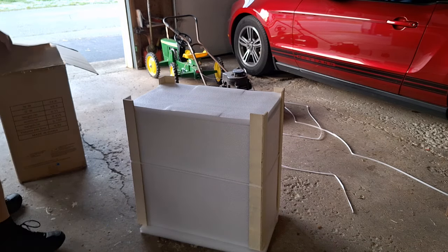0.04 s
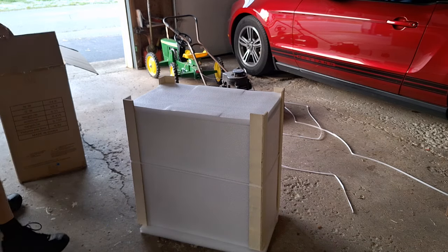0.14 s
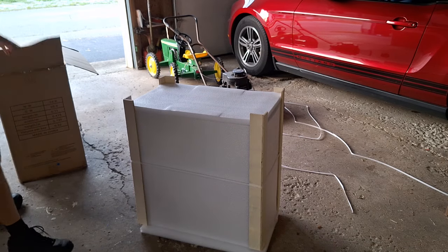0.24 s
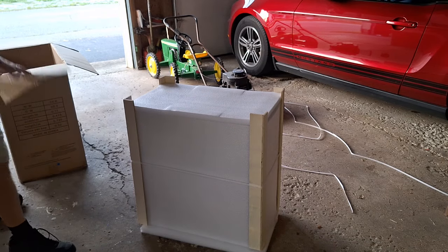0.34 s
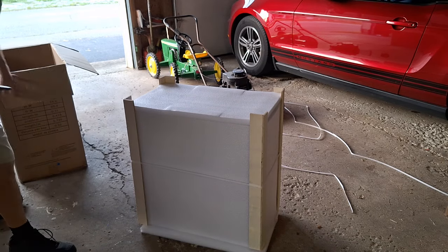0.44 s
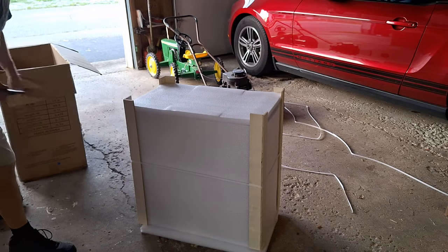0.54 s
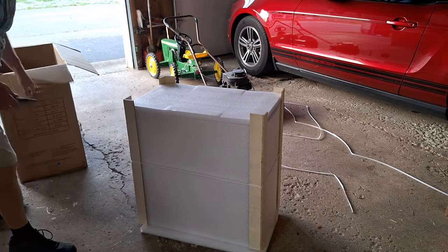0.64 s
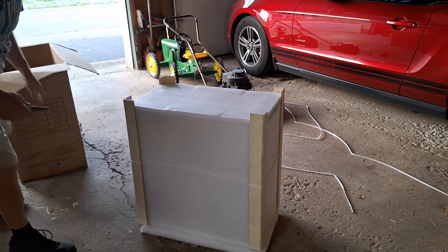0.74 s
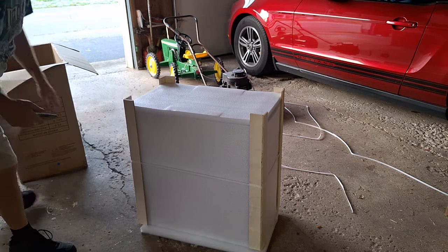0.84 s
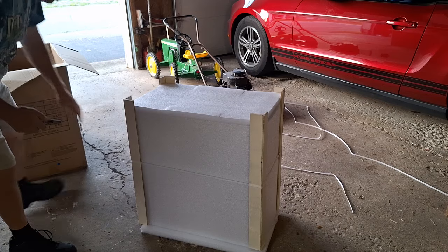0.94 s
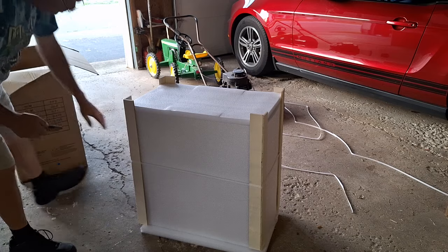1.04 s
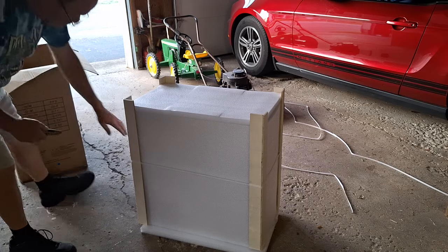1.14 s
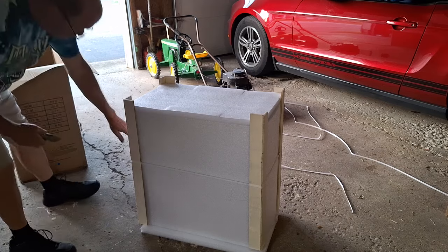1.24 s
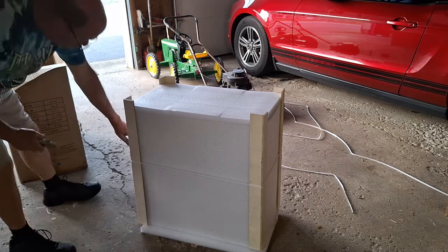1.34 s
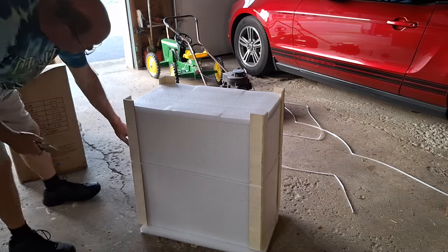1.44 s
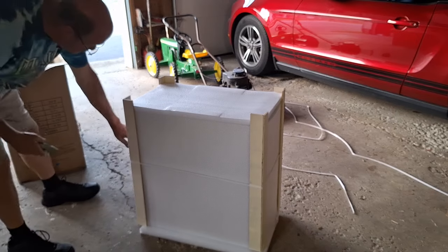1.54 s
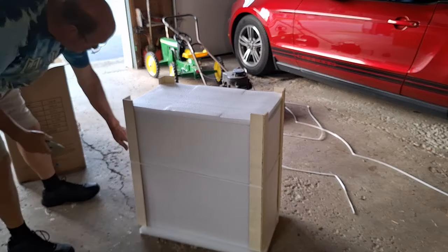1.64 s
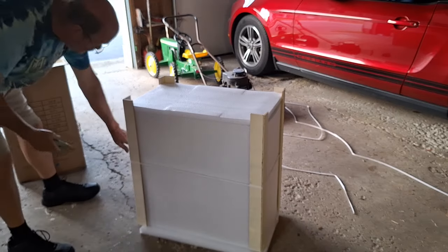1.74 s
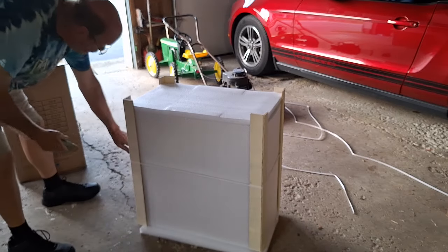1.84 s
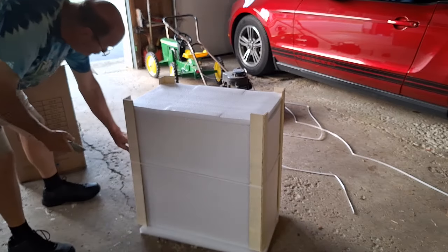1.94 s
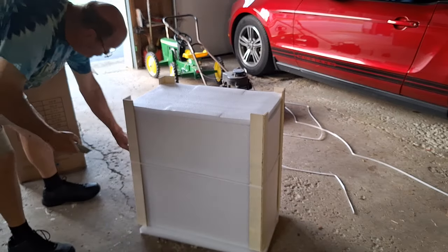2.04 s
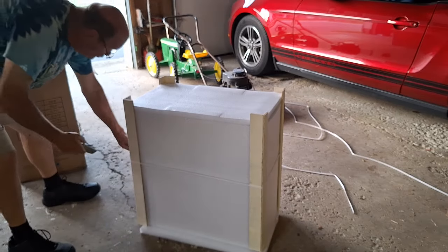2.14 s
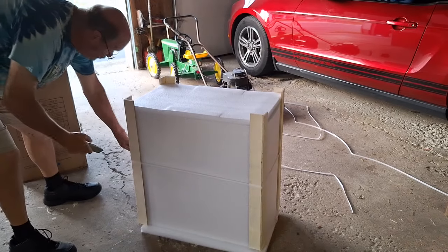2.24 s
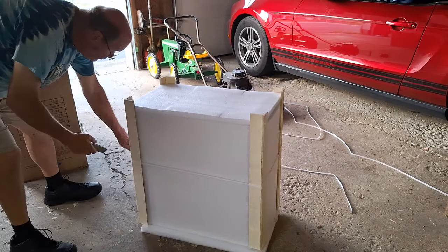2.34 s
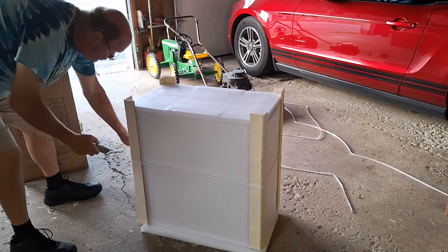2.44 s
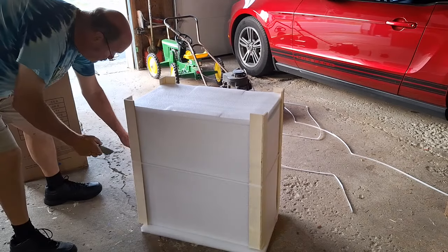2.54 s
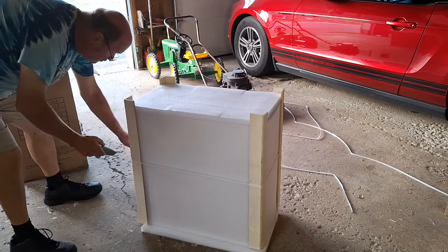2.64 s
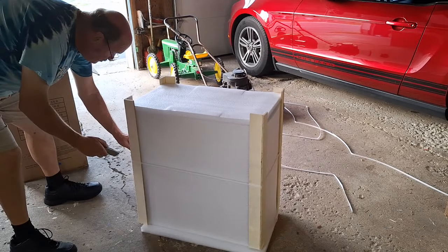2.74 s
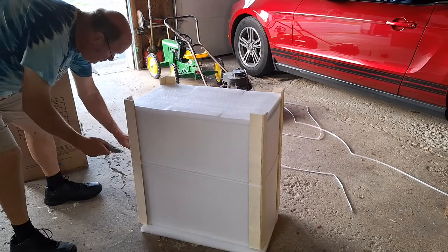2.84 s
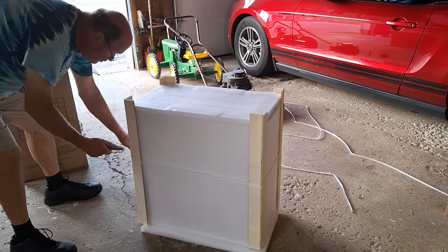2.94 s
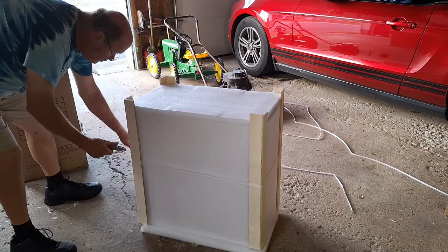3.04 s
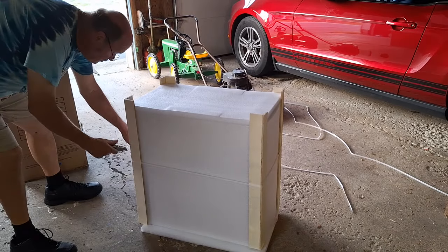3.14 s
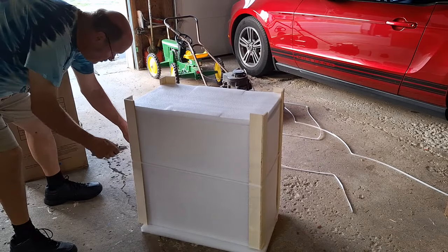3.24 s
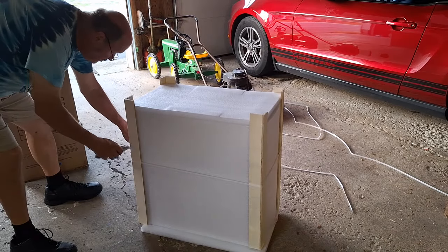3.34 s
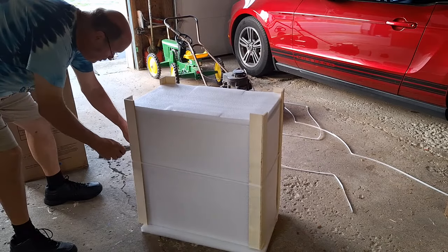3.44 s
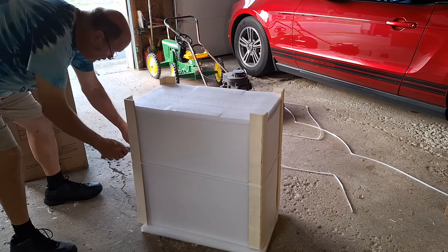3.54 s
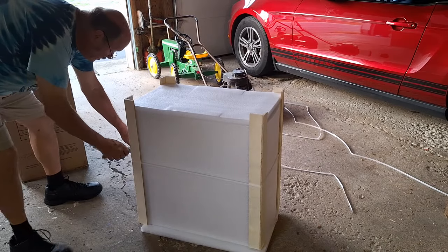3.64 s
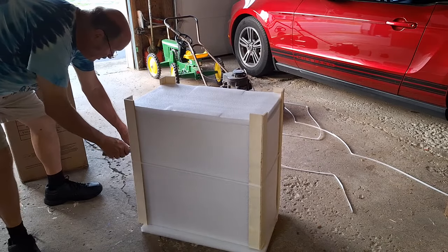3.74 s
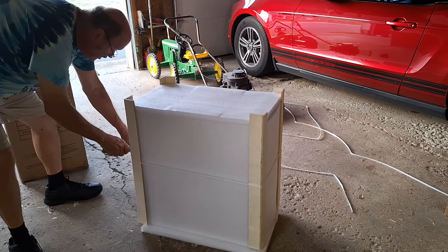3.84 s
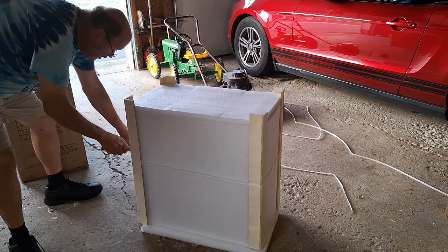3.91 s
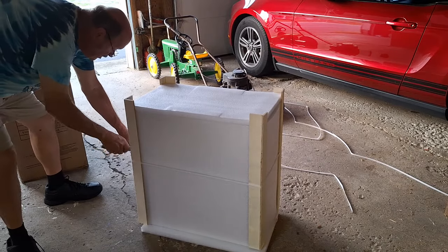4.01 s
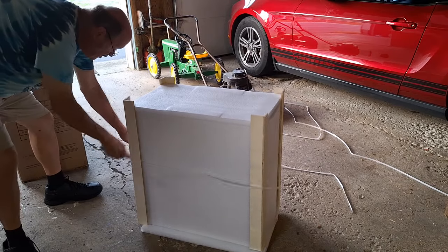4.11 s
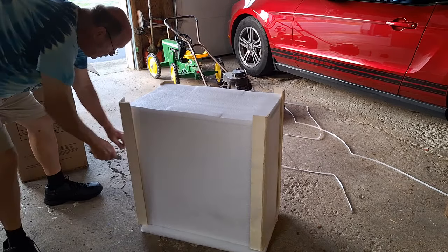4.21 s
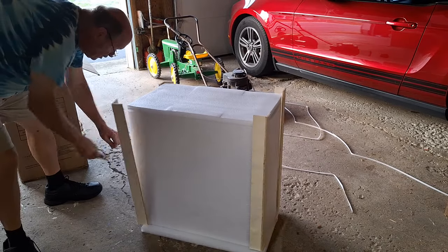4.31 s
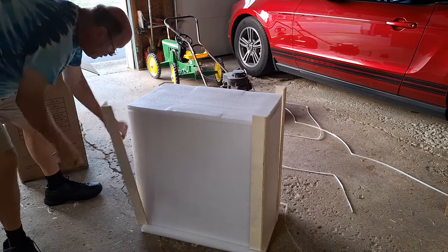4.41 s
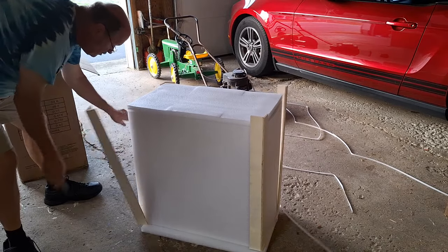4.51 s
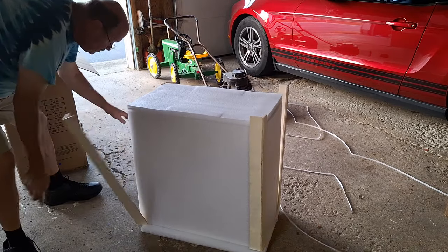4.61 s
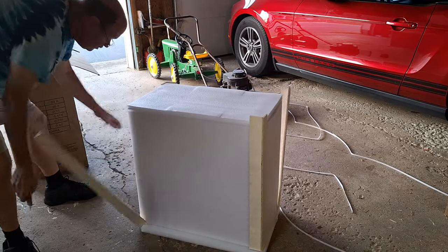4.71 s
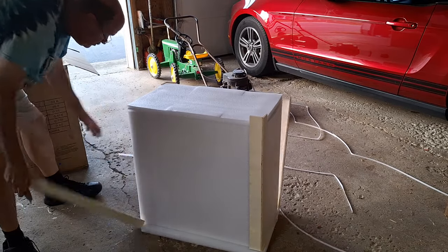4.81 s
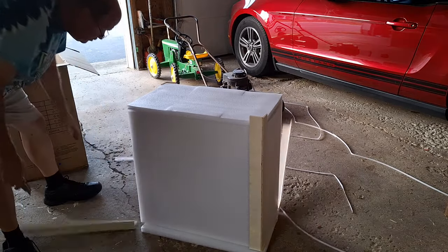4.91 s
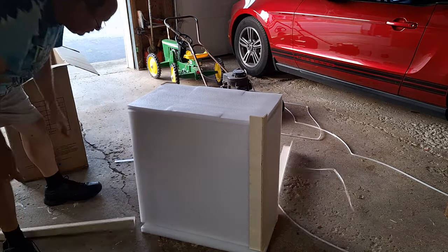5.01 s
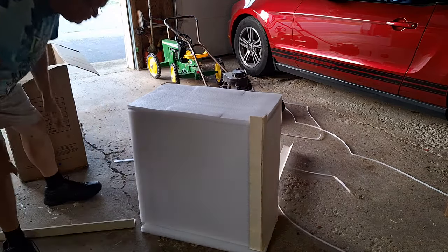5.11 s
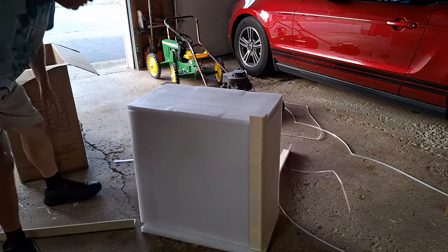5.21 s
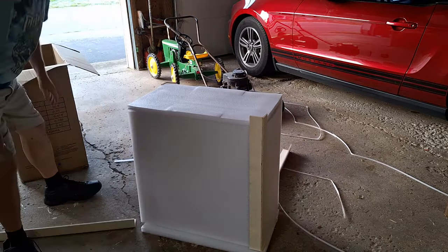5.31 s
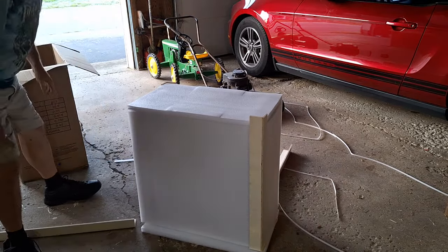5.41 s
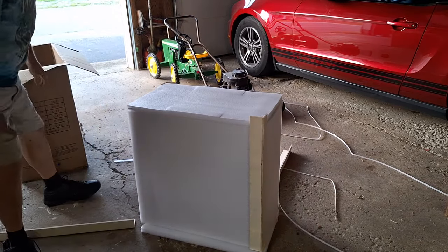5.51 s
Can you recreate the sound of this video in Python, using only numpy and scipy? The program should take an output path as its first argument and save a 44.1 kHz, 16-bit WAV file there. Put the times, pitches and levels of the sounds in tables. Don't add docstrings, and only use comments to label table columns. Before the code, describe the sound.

In an open concrete garage, cardboard rubs and knocks softly, shoes scuff, and faint bird whistles drift in. A blade squeaks briefly on a taut strap, which snaps with a hollow metallic boom. A loose post rattles, then slaps the floor very loudly, bouncing and ringing. Low traffic and insects continue outside. Small camera microphone, close by, stereo.

```python
import sys
import numpy as np
from scipy import signal
from scipy.fft import rfft, irfft, next_fast_len
from scipy.io import wavfile
from scipy.ndimage import map_coordinates

SR = 44100
rng = np.random.default_rng(int(sys.argv[2]) if len(sys.argv) > 2 else 0)


def generate_wav(signal):
    frames = np.transpose(np.atleast_2d(signal))
    scaled = np.clip(frames, -1, 1) * 32767
    pcm = np.round(scaled).astype(np.int16)
    wavfile.write(sys.argv[1], SR, pcm)


def boost_factor(decibels):
    exponent = np.asarray(decibels, float) / 20
    return 10 ** exponent


N = 245317

# (time [s], peak level [dB])
SLAPS = [(5.018, -7.5), (5.0391, -11), (5.0597, -7.5), (5.0799, -12), (5.0986, -22.5), (5.112, -20.5),
         (5.137, -22), (5.2351, -31.5), (5.2591, -29.5), (5.2748, -32), (5.3, -31.5)]
# (frequency [Hz], level [dB per Hz])
CRACK = [(1500, -21), (2300, -10), (3300, -2.5), (5800, -3), (7700, 2), (9400, -4), (12000, -0.5),
         (15700, -4.5)]
# (frequency [Hz], level [dB per Hz])
CARD = [(240, -52), (400, -11.5), (671, -2), (754, -3), (829, -5.5), (903, -3.5), (1040, -6.5),
        (1140, -3.5), (2010, -9.5), (5000, -16), (6500, -34), (11000, -120)]
# (frequency [Hz], level [dB per Hz])
THUD = [(41, -25), (70, -6), (97, -7), (204, 1), (278, -5.5), (316, 0.5), (900, -12), (1170, -60),
        (1980, -120)]
# (frequency [Hz], level [dB per Hz])
CLAP = [(2350, -15), (4000, -3), (7720, -5.5), (9930, -11.5), (13500, -10), (15700, -19)]
# (frequency [Hz], level [dB per Hz])
POST = [(240, -42), (400, -18.5), (594, -15.5), (764, -4), (925, -8), (1290, -4.5), (1410, -3.5),
        (2440, -5.5), (2920, -7), (7000, -30), (9100, -34), (15400, -120)]


def unit(x):
    return x / np.sqrt(np.mean(x ** 2) + 1e-20)


def along(points, hz):
    f, value = np.transpose(points)
    return np.interp(np.log(hz + 1), np.log(f + 1), value)


def curves(rows):
    s, *columns = np.transpose(rows)
    return [np.interp(np.arange(N) / SR, s, column, -120, -120) for column in columns]


def wobble(rate, size=N):
    knots = rng.standard_normal(int(max(size, SR // 2) * rate / SR) + 4)
    return map_coordinates(knots, [np.arange(size) * rate / SR])


def filtered(x, response):
    n = x.shape[-1]
    m = next_fast_len(n + 8192)
    return irfft(rfft(x, m) * response(np.fft.rfftfreq(m, 1 / SR)), m)[..., :n]


def coloured(spectrum, size):
    return unit(filtered(rng.standard_normal(size), lambda hz: boost_factor(along(spectrum, hz))))


def push(spectrum, like):
    pulse = filtered(signal.unit_impulse(len(like), 300), lambda hz: boost_factor(along(spectrum, hz)))
    return pulse * np.linalg.norm(like) / np.linalg.norm(pulse)


def ring(hz, db, t60):
    t = np.arange(min(SR // 2, round(1.2 * t60 * SR))) / SR
    flutter_db = min(hz, 1500) / 400 * wobble(70, len(t))
    drift = hz / 1100 * wobble(110, len(t))
    attack = 1 - np.exp(-t * hz / 0.58)
    tone = boost_factor(db + flutter_db - 60 * t / t60) * np.sin(2 * np.pi * hz * t + drift) * attack
    return np.pad(tone, (0, SR // 2 - len(t)))


def strokes(rows, rise, fall):
    t = np.arange(0, N / SR + .002, .001)
    power = 0
    for s, long, *db in rows:
        slope_db = rise * np.maximum(s - t, 0) + fall * np.maximum(t - s - long, 0)
        power = power + boost_factor(np.array(db)[:, None] - slope_db) ** 2
    return [np.interp(np.arange(N) / SR, t, np.sqrt(p)) for p in power]


def ports(pair, lag=8):
    # (frequency [Hz], correlation [-1 to 1])
    likeness = [(60, 0.93), (180, 0.93), (550, 0.687), (1650, -0.15), (4970, -0.076), (15000, -0.36)]
    turn = lambda hz: np.arccos(np.clip(along(likeness, hz), -1, 1)) / 2
    mid, side = filtered(pair, lambda hz: np.array([np.cos(turn(hz)), np.sin(turn(hz))]))
    return np.array([mid + side, np.roll(mid - side, round(lag))])


def echo(x):
    # (frequency [Hz], t60 [s])
    decay = [(120, 0.41), (500, 0.34), (2000, 0.49), (6000, 0.35), (14000, 0.28)]
    hz, t, z = signal.stft(rng.standard_normal((2, SR * 2 // 3)), SR, nperseg=256)
    tail = signal.istft(z * boost_factor(-60 * t / along(decay, hz)[:, None]), SR, nperseg=256)[1]
    build_up = 1 - np.exp(-np.arange(tail.shape[1]) / SR / 0.00085)
    tail = ports(tail * build_up)
    return signal.fftconvolve(x[None], tail / np.linalg.norm(tail[0]), axes=1)


def add(out, s, x, pan_db, wet_db, feed=None, lag=8):
    i = round(s * SR)
    out[0, i:i + len(x)] += boost_factor(pan_db / 2) * x
    out[1, i + lag:i + lag + len(x)] += boost_factor(-pan_db / 2) * x
    wet = echo(x if feed is None else feed)
    out[:, i:i + wet.shape[1]] += boost_factor(wet_db) * boost_factor([[pan_db / 4], [-pan_db / 4]]) * wet


def add_rings(out, rings):
    track = np.zeros(N)
    for s, *mode in rings:
        i = round(s * SR)
        track[i:i + SR // 2] += ring(*mode)[:N - i]
    add(out, 0, track, 1.5, -8)


def contacts(out, rows, top, body, t60, pan_db, wet_db, soft=0.037):
    t = np.arange(SR // 4) / SR
    attack = 1 - np.exp(-t / (soft * t60))
    for s, db, body_db, thud_db in rows:
        crack = coloured(top, len(t)) * boost_factor(db - 5.0 - 60 * t / t60)
        hollow = coloured(body, len(t)) * boost_factor(db - 4.0 + body_db - 60 * t / (1.62 * t60))
        thud = coloured(THUD, len(t)) * boost_factor(db - 2.0 + thud_db - 60 * t / (3 * t60))
        thud = thud * (1 - np.exp(-t / 0.0019))
        feed = push(top, crack) + push(body, hollow) + thud
        add(out, s, (crack + hollow + thud) * attack, pan_db, wet_db, feed)


def post_slap(out):
    # (time [s], crack level [dB],
    # body over crack [dB], thud over crack [dB])
    edges = [(5.0400, -10.5, 1, -29.5), (5.0600, -7.5, -5, -26), (5.0660, -8, -7, -30),
             (5.0985, -13, -1, -28), (5.139, -21, 1, -30), (2.2128, -43, -9, -30), (4.2726, -23, -1, 1),
             (5.0187, -8.5, -14, -4)]
    # (time [s], crack level [dB], body over crack [dB], thud over crack [dB])
    settle = [
        (5.386, -50, 21.8, 2.7),
        (5.402, -55, 20.3, 2.8),
        (5.4193, -59.5, 17, 3),
    ]
    # (frequency [Hz], level [dB], t60 [s])
    flat = [(268, -20, 0.11), (1283, -3, 0.078), (1510, -2.5, .05), (2075, -6, 0.082), (2410, 1, 0.045),
            (3180, -6, .05), (3730, -1, 0.043)]
    contacts(out, edges, CLAP, POST, t60=0.0037, pan_db=5.0, wet_db=-1)
    slaps = [(s, db, 2.5, -24 - 0.3 * db) for s, db in SLAPS]
    contacts(out, slaps, CLAP, POST, t60=0.026, pan_db=1.5, wet_db=0.5)
    contacts(out, settle, CLAP, POST, t60=0.035, pan_db=1.5, wet_db=0.5, soft=0.096)
    below_slap_db = -10
    add_rings(out, [(s, hz, db + level + below_slap_db + rng.normal(0, 2.77), t60)
                    for s, db in SLAPS for hz, level, t60 in flat])


def strap_snap(out):
    # (time [s], crack level [dB], body over crack [dB], thud over crack [dB])
    snap = [
        (4.158, -11, -6, -14),
    ]
    # (frequency [Hz], level [dB per Hz])
    snap_top = [(600, -6), (1300, -11), (2200, -24), (3400, -25), (5500, -13), (8000, -3), (12000, -4.5),
                (15700, -4.5)]
    # (frequency [Hz], level [dB], t60 [s])
    panels = [(146.4, -3.5, 0.081), (135, -17.5, 0.33), (163.1, -18, 0.33), (194.5, -21, 0.37),
              (224, -22.5, 0.21), (332, -25, 0.15), (420, -30, 0.09), (437, -13.5, 0.036),
              (1293, -17, 0.029), (617, -22, .04), (1640, -25.5, 0.026), (950, -38, 0.13),
              (1310, -27.5, 0.23), (2070, -41, 0.107), (2430, -39, .1)]
    contacts(out, snap, snap_top, CARD, t60=0.031, pan_db=3.0, wet_db=-0.6)
    add(out, 4.1585, sum(ring(*mode) for mode in panels), 1.5, -8)


def loose_post(out):
    # (time [s], level [dB])
    rattle = [(4.272, -26), (4.293, -29.5), (4.316, -30), (4.333, -33), (4.361, -30), (4.369, -31.5),
              (4.385, -35), (4.417, -31.5), (4.44, -37.5), (4.455, -40)]
    # (frequency [Hz], level [dB], t60 [s])
    loose = [(750, -.6, .11), (910, -1.2, .13), (1140, -3, .08), (1310, -6, .08), (1570, -5, .1),
             (1850, -10, .06), (2200, -9, .07), (2450, -10, .05)]
    add_rings(out, [(s, hz, db + level + rng.normal(1, 2.8), t60)
                    for s, db in rattle for hz, level, t60 in loose])


def strap(out):
    # (time [s], pitch [Hz], level [dB])
    squeak_path = [(3.645, 1090, -66), (3.66, 1070, -50), (3.68, 1040, -44), (3.72, 995, -46),
                   (3.74, 985, -60)]
    # (time [s], level [dB])
    saw = [(3.665, -64), (3.69, -44), (3.75, -42), (3.78, -46), (3.815, -48), (3.84, -56), (3.95, -74)]
    # (frequency [Hz], width [Hz], level [dB])
    resonances = [(635, 170, -3), (1030, 200, -5), (1730, 300, -6), (2400, 600, -10), (3220, 500, -10)]
    # (time [s], frequency [Hz], level [dB], t60 [s])
    twangs = [(3.692, 640, -38, 0.073), (3.716, 630, -34.5, 0.078), (3.74, 645, -30.5, 0.076),
              (3.753, 660, -37, .05), (3.797, 643, -41, .08), (3.855, 600, -46, 0.11),
              (3.878, 607, -42, 0.057)]

    def taut(f):
        total = 0
        for k, (centre, width, db) in enumerate(resonances):
            peak = 1j * f * width / (centre * centre - f * f + 1j * f * width)
            total = total + (-1) ** k * boost_factor(db) * peak
        return total

    hz, db = curves(squeak_path)
    turn = 2 * np.pi * np.cumsum(hz * (1 + 0.02 * wobble(150))) / SR
    voice = np.sin(turn) + 1.0 * np.sin(2 * turn) + 0.078 * np.sin(3 * turn)
    squeak = boost_factor(db + 2.0 + 1.5 * wobble(90)) * voice
    slips = rng.standard_normal(N) * boost_factor(3 * wobble(110))
    sawing = boost_factor(curves(saw)[0] + 1.0) * unit(filtered(slips, taut))
    add(out, 0, squeak + sawing, 2.5, -4)
    add_rings(out, twangs)


def handling(out):
    # (time [s], crack level [dB], body over crack [dB], thud over crack [dB])
    box = [(0.184, -33.5, -12, -5.5), (0.4403, -45, 4.5, -32), (.489, -38.5, -7, 2), (0.5064, -33, 1, 1),
           (.528, -41, -5, 8), (.562, -47, -9, 6), (.659, -48.5, -2, 3), (0.7593, -40.5, -24, -2.5),
           (.854, -48.5, -10, 9.5)]
    shoes = [(1.018, -49, -24, -3), (1.2184, -52.5, -8, -1), (1.3726, -48, -0.5, -0.5),
             (1.5189, -52.5, 2, 5.5), (1.837, -49, -2.5, -1), (2.07, -48, -5.5, -1), (2.1639, -51, 2.5, 3),
             (2.2117, -38.5, -3, -10.5), (2.25, -37.5, -1, -7), (2.5696, -47.5, -15.5, -24.5)]
    hands = [(4.019, -56, -16, -1), (4.2709, -31, 9, 1.5), (4.419, -50.5, 12, 12.5),
             (4.5011, -22, -15, -30), (4.8895, -34, -14, -31)]
    scuffs = [(.108, -35, -8.5, -18), (.8, -33, -25.5, -10.5), (2.423, -37.5, -1, -18.5),
              (4.128, -29, -13, -13.5), (4.359, -46, 17, 8.5), (4.725, -35, -6.5, -38)]
    ticks = [(4.272, -27.5, 8.5, 3), (4.641, -31.5, -7, -35), (4.9052, -32, -12, -24),
             (4.1605, -11.5, -12, -30), (4.8897, -30, -13, -30), (4.2802, -37, 15, 0), (4.303, -40, 17, 0),
             (4.3165, -40, 18, 0), (4.3612, -40.5, 18, 0), (4.3688, -40, 18, 0), (4.4175, -47, 18, -1),
             (.5073, -33.5, 7, 5.5), (2.4, -52, 8, -5), (2.2128, -42, 6, -10), (.195, -46, 8, 5)]
    latch = [
        (.44, -29, -6, -21),
        (4.335, -33, -30, -30),
    ]
    snip = [
        (2.8224, -31.5, -46, -30),
    ]
    buckle = [
        (5.383, -23.5, -5, -25),
    ]
    # (frequency [Hz], level [dB per Hz])
    snip_top = [(1800, -40), (2400, -5), (3300, -3.5), (5800, -4.5), (7700, 1.5), (9400, -8), (12000, 1.5),
                (15700, -8)]
    buckle_top = [(1200, -14), (3000, -4), (5500, 0), (8000, -2), (9000, -25), (16000, -40)]
    contacts(out, box, CRACK, CARD, t60=0.036, pan_db=1.5, wet_db=1.0)
    contacts(out, shoes, CRACK, CARD, t60=0.048, pan_db=5.0, wet_db=2.1)
    contacts(out, hands, CRACK, CARD, t60=0.0561, pan_db=3.0, wet_db=0.95)
    contacts(out, scuffs, CRACK, CARD, t60=0.044, pan_db=2.0, wet_db=3.5, soft=0.072)
    contacts(out, ticks, CRACK, CARD, t60=0.0046, pan_db=-1.5, wet_db=3.0)
    contacts(out, latch, CRACK, CARD, t60=0.005, pan_db=4, wet_db=-4)
    contacts(out, snip, snip_top, CARD, t60=0.031, pan_db=3.2, wet_db=4.0)
    contacts(out, buckle, buckle_top, CARD, t60=0.005, pan_db=-1, wet_db=-11)


def card_rings(out):
    # (time [s], frequency [Hz], level [dB], t60 [s])
    singles = [(.508, 172.6, -28.5, 0.21), (.508, 211, -26, 0.13), (0.2, 150, -48, 0.18),
               (2.25, 140, -41, 0.36), (2.438, 403, -40.5, 0.15), (5.385, 159, -41, .16),
               (.187, 900, -38.5, 0.12), (.21, 1000, -40, 0.109), (.19, 1500, -45, 0.065),
               (.51, 740, -36, 0.18), (0.47, 610, -50, 0.1), (.75, 560, -42, 0.17), (.678, 762, -42, 0.073),
               (.808, 820, -44.5, 0.062), (0.81, 560, -43, 0.14), (4.8895, 5180, -37.5, .02),
               (5.3, 4200, -47, .02), (.195, 1250, -37.5, 0.078), (0.17, 1130, -39, .12),
               (.2, 780, -43, 0.091), (.225, 950, -40, .07), (.25, 1050, -43, 0.093), (.278, 820, -49, .08),
               (5.019, 330, -27.5, 0.16), (5.019, 220, -31, 0.13), (5.02, 430, -28.5, 0.11),
               (2.212, 640, -40, 0.047), (2.25, 980, -37.5, .12), (2.252, 388, -40, .06),
               (2.432, 850, -41, 0.11), (5.055, 1280, -13.5, 0.11), (5.07, 1090, -17.5, .1),
               (5.062, 2200, -20, .1), (.512, 9500, -45, .05), (0.77, 640, -42, 0.096),
               (2.5, 644, -41.5, 0.053), (4.131, 606, -36.5, 0.21), (5.235, 1380, -20, 0.029),
               (5.257, 1816, -26, 0.12), (5.272, 1600, -29, 0.091), (5.386, 2100, -36, 0.076)]
    add_rings(out, singles)


def slide(out):
    # (start [s], length [s], fizz level [dB], body level [dB])
    rubs = [(.015, 0.4, -54.5, -57.5), (.11, 0.056, -43.5, -45), (.185, 0.047, -62, -38),
            (.25, 0.046, -54, -47), (.445, 0.32, -53, -61), (.5, 0.036, -43.5, -43), (.74, 0.116, -52, -45),
            (1.03, 0.029, -64, -58), (1.19, 0.17, -67.5, -56), (1.34, 0.084, -63, -51),
            (1.53, 0.043, -67, -50), (1.84, 0.04, -66, -50.5), (2.07, 0.16, -70, -55),
            (2.21, 0.079, -70, -42), (2.435, 0.018, -45.5, -42), (3.68, 0.087, -50, -41),
            (3.765, 0.036, -50, -37.5), (3.95, 0.31, -78, -54.5), (4.5, 0.59, -56, -53.5),
            (4.51, 0.02, -58, -41.5), (4.72, 0.059, -56, -51), (4.95, 0.049, -54, -51),
            (5.258, 0.14, -53, -54), (.63, 0.11, -58, -45.5), (.84, 0.038, -62, -39), (.06, .06, -56, -52),
            (.04, .05, -57, -55), (.09, .03, -53, -56)]
    # (frequency [Hz], level [dB per Hz])
    fizz_tone = [(1500, -23), (2300, -5), (3300, -1.5), (5000, -6), (7700, 0.5), (9400, -3.5),
                 (12000, -2.5), (15700, -1)]
    # (frequency [Hz], level [dB per Hz])
    scrape_tone = [(200, -34), (400, -6), (700, 2), (1000, 0), (1350, -2.5), (2000, -10.5), (5000, -14),
                   (9000, -60)]
    bright, dull = strokes(rubs, rise=898.5, fall=219)
    fizz = unit(coloured(fizz_tone, N) * boost_factor(1.6 * wobble(230) + 2.3 * wobble(33.95)))
    body = unit(coloured(scrape_tone, N) * boost_factor(2.5 * wobble(120) + 1.5 * wobble(30)))
    low = unit(coloured(THUD, N) * boost_factor(3.3 * wobble(25)))
    add(out, 0, boost_factor(-2.5) * bright * fizz + dull * (boost_factor(-12) * body + boost_factor(-16) * low), 1.5, -3)


def bird(out):
    # (time [s], length [s], start pitch [Hz], level [dB], slide time [s])
    whistles = [ (1.7, .045, 2950, -73, .015), (1.75, .028, 2600, -69, .006), (1.862, .03, 2950, -63, .035),
                (1.885, .045, 2850, -64, .018), (2.345, .055, 2290, -62, .026),
                (2.405, .04, 2650, -61, .05), (2.31, .03, 2400, -61, .02), (2.836, .09, 3100, -63, .011),
                (2.918, .11, 2430, -62, .026), (3.02, .075, 2720, -61, .034), (3.025, .03, 3250, -66, .03),
                (3.115, .03, 2550, -67, .012), (2.825, .03, 3500, -64, .03), ]
    # (time [s], length [s], top pitch [Hz], level [dB])
    flicks = [
        (1.772, .095, 2480, -62),
        (2.8, .03, 3250, -70),
        (2.885, .03, 2950, -66),
        (1.91, .045, 2780, -72),
    ]
    rest_hz, arch_hz = 2270, 200
    song = np.zeros(N)
    waver, throb_db = 1 + .017 * wobble(150), 4 * wobble(70)
    for s, long, top, db, *slide_s in whistles + flicks:
        t = np.arange(round(long * SR)) / SR
        i = round(s * SR)
        here = slice(i, i + len(t))
        arch = np.sin(np.pi * t / long)
        if slide_s:
            hz = rest_hz + (top - rest_hz) * np.exp(-t / slide_s[0])
        else:
            hz = top - arch_hz * (1 - arch)
        turn = 2 * np.pi * np.cumsum(hz * waver[here]) / SR
        song[here] += boost_factor(db + throb_db[here]) * arch ** .4 * np.sin(turn)
    add(out, 0, song, 3, -6, lag=0)


def outside():
    # (time [s], level [dB])
    traffic = [(0.0, -56), (0.67, -52.5), (1.72, -56.5), (2.29, -54), (4.29, -55.5), (4.54, -54),
               (4.79, -53.5), (5.22, -64), (5.56, -58)]
    # (start [s], length [s], level [dB])
    engine = [
        (0, 0.24, -64),
        (1.45, 0.069, -56.5),
        (2.2, 0.3, -57.5),
        (4.1, 0.85, -53.5),
    ]
    # (time [s], level [dB])
    chorus = [(0, -64), (5.1, -62), (5.45, -69), (5.563, -64)]
    # (frequency [Hz], level [dB per Hz])
    air_tone = [(15, -37), (25, -7), (58, 1), (124, -18.5), (209, -22.5), (325, -26.5), (366, -22),
                (466, -36.5), (558, -23.5), (616, -31.5), (958, -37.5), (1220, -37), (1750, -45.5),
                (2410, -43), (3000, -57), (3900, -83), (6600, -120)]
    # (frequency [Hz], level [dB per Hz])
    insect_tone = [(2200, -54), (2900, -20), (3500, -8), (4500, -6), (5400, -3.5), (6300, -12), (7600, -15),
                   (9100, -26.5), (16000, -27.5)]
    # (frequency [Hz], left over right [dB])
    lean_curve = [(60, 4), (240, 0.5), (950, 3), (3770, 4), (15000, 2.5)]
    (rumble_db,), (insects_db,) = curves(traffic), curves(chorus)
    rumble_tone = [(20, -44), (38, -4.0), (52, 2), (62, 0), (75, -6.5), (110, -74.0)]
    rumble = boost_factor(rumble_db + 8.0 + 0.52 * wobble(5.26)) * coloured(rumble_tone, (2, N))
    swell = boost_factor(-63) + strokes(engine, rise=61, fall=61)[0]
    drone_tone = [(60, -30), (88, -3.5), (99, 5.5), (112, -3.0), (170, -46.0)]
    drone = boost_factor(1.0) * swell * coloured(drone_tone, (2, N))
    above_rumble = [(90, -70)] + [p for p in air_tone if p[0] > 120]
    air = boost_factor(-59.5 + 0.56 * wobble(2.84)) * coloured(above_rumble, (2, N))
    insects = boost_factor(insects_db + 2.5 + 0.52 * wobble(32.0)) * coloured(insect_tone, (2, N))
    whine_hz = 12900
    whine = boost_factor(insects_db - 27.0 + 4.3 * wobble(60)) * np.sin(2 * np.pi * whine_hz * np.arange(N) / SR)
    lean = lambda hz: boost_factor(along(lean_curve, hz) * [[.5], [-.5]])
    return filtered(ports(rumble + drone + air + insects), lean) + whine


def scene():
    # (frequency [Hz], left over right [dB])
    near_balance = [(100, -1), (4000, 0.5), (9000, 1.5), (15000, -8.5)]
    out = np.zeros((2, N + SR))
    post_slap(out)
    strap_snap(out)
    loose_post(out)
    strap(out)
    handling(out)
    card_rings(out)
    slide(out)
    bird(out)
    near = filtered(out[:, :N], lambda hz: boost_factor(along(near_balance, hz) * [[.5], [-.5]]))
    return near + outside()


def top_cut(x):
    return signal.sosfilt(signal.butter(12, 16810, fs=SR, output="sos"), x)


def record(dry):
    top_hz, edge_hz, bass_hz = 15800, 16600, 37

    def response(hz):
        band = np.where(hz < top_hz, 1, boost_factor(-42) * (hz < edge_hz))
        return band / (1 - 1j * bass_hz / (hz + 1)) ** 2

    kept = filtered(np.clip(dry, -.95, .95), response)
    return top_cut(kept)


dry = scene()
out = record(dry)
generate_wav(out)
```